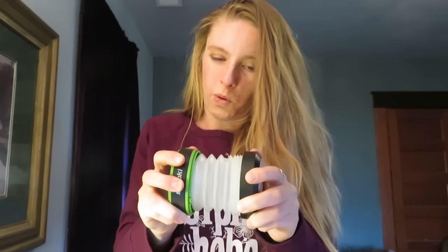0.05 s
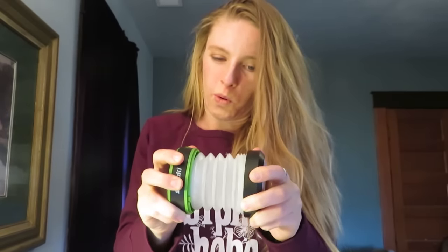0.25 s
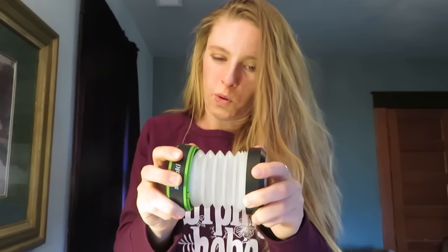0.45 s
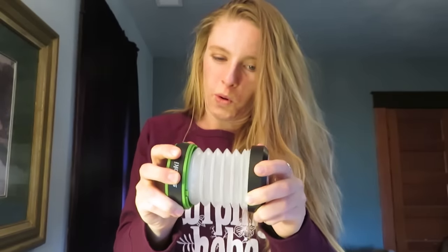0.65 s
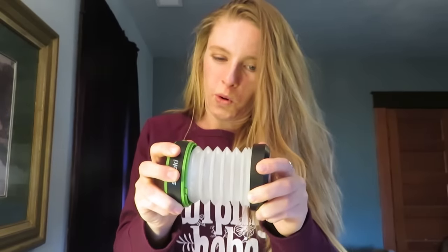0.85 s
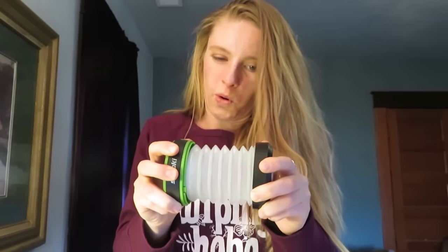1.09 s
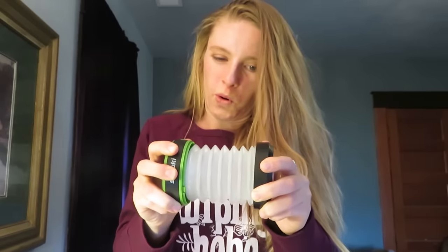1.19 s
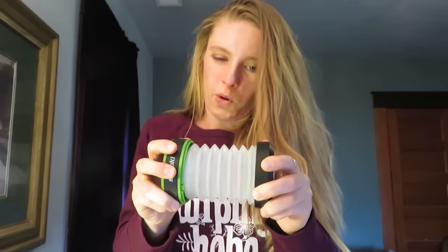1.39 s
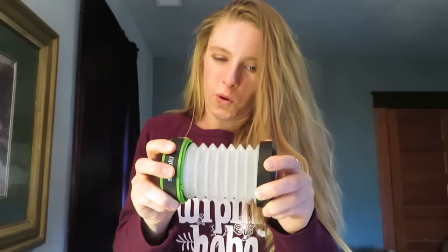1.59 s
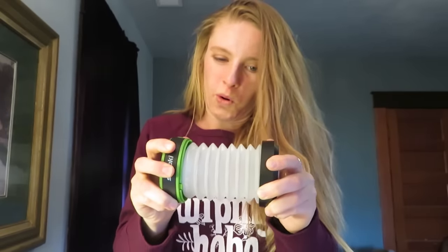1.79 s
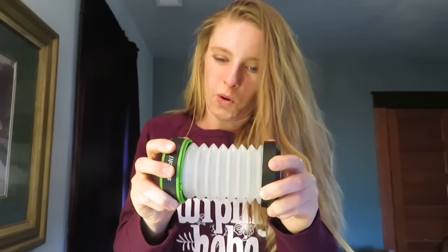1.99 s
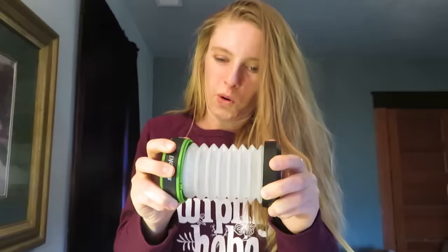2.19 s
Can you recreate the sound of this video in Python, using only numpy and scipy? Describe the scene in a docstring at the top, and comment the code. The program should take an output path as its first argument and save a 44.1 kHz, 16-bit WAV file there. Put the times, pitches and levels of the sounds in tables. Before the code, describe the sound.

A collapsible lantern is pulled open by hand. Its rubber folds slip softly and snap through one after another, making four hollow pops with tiny crinkles, close to the microphone in a quiet room with low hum and hiss.

```python
"""A low hum and microphone hiss in a quiet room, then a soft slip and the first of four hollow pops.
Close to a stereo microphone pair, a collapsible lantern is pulled open by hand. Four folds of its
rubber bellows turn out in turn: each slips a little, then snaps through and sets the soft wall ringing.
The room answers briefly, and the recorder's gain control ducks a little after each pop."""
import sys
import numpy as np
from scipy import signal
from scipy.fft import rfft, irfft
from scipy.io import wavfile
from scipy.ndimage import uniform_filter1d

SR = 44100
rng = np.random.default_rng(int(sys.argv[2]) if len(sys.argv) > 2 else 0)


def waveform_to_disk(signal):
    """Save audio, clipped to [-1, 1], as 16-bit WAV at the path in sys.argv[1]."""
    frames = np.transpose(np.atleast_2d(signal))
    scaled = np.clip(frames, -1, 1) * 32767
    samples = np.round(scaled).astype(np.int16)
    wavfile.write(sys.argv[1], SR, samples)


N = 99225

# room air at the microphones: f/Hz, relative level/dB
AIR_SPECTRUM = [(12, -41), (24, -23.5), (45, -10.5), (70, -13.5), (100, -16.5), (175, -14), (240, -22.5),
                (400, -25), (600, -25.5), (950, -27), (1300, -31), (2500, -34.5), (4500, -39.5),
                (6100, -39), (6750, -37.5), (10000, -47), (15000, -44)]
# how alike the two microphones hear the air: f/Hz, correlation
AIR_LIKENESS = [(40, 0.99), (130, 1), (300, 0.46), (1000, 0.47), (2500, 0.17), (5000, 0.65), (8000, 0.36),
                (14000, -0.58)]
# drift of the hiss: t/s, gain/dB
HISS_GAIN = [(0, 1), (.18, 2), (.3, 0.5), (.62, 0.5), (.76, 3), (1.05, 1.5), (1.3, 5), (1.56, 1), (2, 1.5),
             (2.25, -2.5)]
# partials of the hum: f/Hz, level/dB
HUM_PARTIALS = [(45, -44), (91.5, -50.5), (134, -54)]
# brief dips of the hum: t/s, gain/dB
HUM_GAIN = [(0, -1), (.19, -4.5), (.24, -20), (.31, -14), (.36, 2), (.72, -3), (.82, -2), (.9, -1.5),
            (1.1, 2.5), (1.45, -.5), (1.69, -10), (1.85, -0.5), (2.15, 1.5)]

# reverberation time of the room: f/Hz, t60/s
ROOM_DECAY = [(100, 0.25), (300, 0.46), (700, 0.4), (1800, 0.35), (5000, 0.49), (12000, 0.24)]
# colour of the diffuse tail: f/Hz, gain/dB
TAIL_COLOUR = [(100, -13), (200, 2.5), (330, -4.5), (430, -1), (620, -8), (820, 0.5), (1500, -1),
               (2500, -5), (6000, 2.5), (14000, 0)]
# how alike the two microphones hear the tail: f/Hz, correlation
TAIL_LIKENESS = [(30, .999), (500, 0.98), (1000, 0.99), (2500, 0.92), (8000, 0.14)]
# standing waves of the room: f/Hz, gain/dB
STANDING_WAVES = [(133, 12), (261, 12), (285, 5), (300, 9), (383, 4.5), (435, 8), (463, 8), (509, 9),
                  (698, 1), (798, 10), (945, 10)]
# echoes from near surfaces: delay/s, gain/dB
NEAR_ECHOES = [(.0068, -18), (0.0118, -21), (0.0315, -23)]
# the pop as it leaves the far sides of the bellows: f/Hz, relative level/dB
SCATTER_SPECTRUM = [(100, -27), (210, -13), (290, 5.5), (360, -9), (450, 2), (600, -5), (780, -3),
                    (1000, -15.5), (1300, -13.5), (1800, -23.5), (2600, -15), (4000, -35.5), (12000, -51.5)]

# crinkles as a fold settles: t/s, ring/dB, ring f/Hz, fizz/dB
WALL_CRINKLES = [(.2045, -24, 2210, -30), (0.209, -26.5, 1290, -31.5), (0.6867, -17, 787, -37),
                 (0.719, -32, 2300, -42), (1.134, -26, 1210, -44), (1.1577, -35, 1490, -40)]
# slips around the pops: t/s, thud/dB, thud f/Hz, bellows/dB, tick/dB, tick f/Hz, rub/dB
FOLD_SLIPS = [(0.1416, -18, 308, -29.5, -25.5, 2345, -51), (0.667, -15.5, 331, -24.5, -26.5, 2570, -43),
              (1.1110, -19.5, 322, -28.5, -60, 2360, -57), (1.1810, -16, 447.5, -34, -41, 2400, -43),
              (1.6180, -25, 344, -22.5, -34.5, 2630, -43)]
# bellows modes, rung by every slip: f/Hz, relative level/dB, t60/s (capped in ring)
BELLOWS_MODES = [(141.5, 5, 0.19), (650, -9, 0.076)]
# noise of the wall as it cracks, rubs or fizzes: f/Hz, relative level/dB
WALL_NOISE = [(500, 5.5), (2000, 6), (3500, -5), (6000, -5.5), (8500, -13.5), (11000, -28), (15000, -50)]
# the bright click that starts each pop: f/Hz, relative level/dB
CLICK_SPECTRUM = [(4000, -10), (8500, -2), (14000, -24.5)]
# modes of each fold, in opening order: f/Hz, relative level/dB, t60/s (capped in ring)
FOLD_1 = [(135, -22.5, 0.36), (290, -15.5, 0.077), (432, -12, 0.063), (654, 3, 0.017), (717, -17, 0.086),
          (880, -18.5, 0.05), (1157, -9, 0.018), (1573, -7.5, 0.0087), (1844, -19, 0.024),
          (2168, -23, 0.051), (2330, -20.5, 0.029), (2940, -21, 0.0071)]
FOLD_2 = [(129, -16.5, 0.061), (340, -4, 0.061), (428, -8, 0.1), (708, -7.5, 0.028), (770, -4.5, 0.025),
          (1120, -5.5, 0.0065), (1437, -17.5, 0.041), (1680, -24, 0.049), (2352, -11.5, 0.024),
          (3080, -12, 0.011)]
FOLD_3 = [(130.6, -20.5, 0.15), (277.4, -9.5, 0.089), (431, -9.5, 0.071), (503, -11, 0.041),
          (690, -14.5, 0.045), (823, -10.5, 0.042), (934, -21, 0.14), (1126, -18, 0.045),
          (1186, -18, 0.063), (2480, -27, 0.035), (3195, -28, 0.054)]
FOLD_4 = [(139, -20, 0.26), (267, -17, 0.15), (450, 0, 0.0084), (695, 3.5, 0.021), (830, -18, 0.097),
          (942, -18.5, 0.18), (1244, -3.5, .013), (1630, -24.5, 0.039), (1827, -19.5, 0.033),
          (1974, -20.5, 0.021), (2470, -11, 0.011), (2980, -24.5, 0.019)]
# one pop for each fold: t/s, ring/dB, crack/dB, room/dB, scatter/dB
FOLD_POPS = [(0.2004, 3, -35.5, -9.5, -32), (0.6847, -1.5, -28, -8, -33.5), (1.1290, 1, -32.5, -7, -33.5),
             (1.6493, 0, -34, -8.5, -34.5)]

AIR_DB, HISS_FROM_HZ, HUM_DRIFT_HZ, HUM_WAVER = -46.5, 2300, 1.3, 0.25
ROOM_ONSET_S, SMALL_SOUNDS_ROOM_DB = 0.011, -7
CONTACT_S, THUD_RISE_S, TICK_RISE_S, CRACK_RISE_S = 0.00048, 0.00092, 0.0022, 0.00034
LONGEST_RING_S, SOFT_HZ, CLICK_DB = 0.125, 3200, -14.5
RADIATES_FROM_HZ = 175  # the small body sends out little deep bass
DUCK_ABOVE_DB, DUCK_SHARE, DUCK_ATTACK_S, RECOVER_DB_PER_S = -21.5, 0.17, 0.084, 33.5
TREBLE_HZ, EDGE_HZ = 11000, 15300


def amp(db):
    """Decibels to gain."""
    return 10 ** (np.asarray(db) / 20)


def fade(t, t60):
    """Exponential decay, 60 dB down at t60 seconds."""
    return amp(-60 * t / t60)


def read(points, hz):
    """Reads a table on a log-frequency axis."""
    f, value = np.transpose(points)
    return np.interp(np.log(hz + 1), np.log(f + 1), value)


def add(mix, s, sound):
    """Mixes a sound in at s seconds."""
    part = mix[..., round(s * SR):][..., :sound.shape[-1]]
    part += sound[..., :part.shape[-1]]


def butter(hz, kind="low"):
    """A second-order filter."""
    return signal.butter(2, hz, kind, fs=SR, output="sos")


def noise(spectrum, size):
    """Noise with a given spectrum and an rms of one."""
    gain = amp(read(spectrum, np.fft.rfftfreq(size, 1 / SR)))
    x = irfft(rfft(rng.standard_normal(size)) * gain, size)
    return x / np.sqrt(np.mean(x ** 2) + 1e-20)


def wander(count=24):
    """A slow random curve."""
    return np.interp(np.linspace(0, count - 1, N), np.arange(count), rng.standard_normal(count))


def microphone_pair(a, b, likeness):
    """Two microphones in a diffuse field: alike in the bass, less so in the treble."""
    same = np.clip(read(likeness, np.fft.rfftfreq(len(a), 1 / SR)), -1, 1)
    mid = irfft(rfft(a) * np.sqrt((1 + same) / 2), len(a))
    side = irfft(rfft(b) * np.sqrt((1 - same) / 2), len(a))
    return np.array([mid + side, mid - side])


def background():
    """The quiet room: air all around, a drifting microphone hiss and a wavering low hum in the centre."""
    t = np.arange(N) / SR
    hum = np.zeros(N)
    for hz, db in HUM_PARTIALS:
        level = np.sqrt(2) * amp(db) * (1 + HUM_WAVER * wander())
        hum += level * np.sin(2 * np.pi * np.cumsum(hz + HUM_DRIFT_HZ * wander()) / SR)
    air = amp(AIR_DB) * microphone_pair(noise(AIR_SPECTRUM, N), noise(AIR_SPECTRUM, N), AIR_LIKENESS)
    hiss = signal.sosfiltfilt(butter(HISS_FROM_HZ, "high"), air)
    hiss_gain = amp(np.interp(t, *np.transpose(HISS_GAIN)))
    hum_gain = amp(np.interp(t, *np.transpose(HUM_GAIN)))
    return air - hiss + hiss * hiss_gain + hum * hum_gain


def room_tail():
    """Diffuse reflections swell, then each band dies at its own speed."""
    size = SR // 2
    t = np.arange(size) / SR
    swell = 1 - np.exp(-(t / ROOM_ONSET_S) ** 2) + 1e-3
    shape = swell * fade(t, t60=0.4)
    x = rng.standard_normal(size) * shape
    for _ in range(2):  # even out the spectrum, then restore the envelope
        x = irfft(np.exp(1j * np.angle(rfft(x))), size)
        x = x / np.sqrt(uniform_filter1d(x ** 2, size=300) + 1e-20) * shape
    hz, times, bands = signal.stft(x / shape * swell, SR, nperseg=256)
    bands *= fade(times, read(ROOM_DECAY, hz)[:, None]) * amp(read(TAIL_COLOUR, hz))[:, None]
    return signal.istft(bands, SR)[1][:size] / np.linalg.norm(x)


def standing_waves(size):
    """The room's own low notes, which sing on after every pop."""
    t = np.arange(size) / SR
    waves = np.zeros(size)
    for hz, db in STANDING_WAVES:
        dying = fade(t, read(ROOM_DECAY, hz))
        waves += 2 * amp(db) * dying / dying.sum() * np.sin(2 * np.pi * hz * t)
    return waves * (1 - np.exp(-(t / ROOM_ONSET_S) ** 2))


def in_room(x, room_db):
    """A source at close range: direct sound, near echoes, the diffuse tail and the standing waves."""
    burst = x * fade(np.arange(len(x)) / SR, t60=0.08)  # the first burst is what fills the room
    room = microphone_pair(room_tail(), room_tail(), TAIL_LIKENESS) + standing_waves(SR // 2)
    out = amp(room_db) * signal.fftconvolve(burst[None], room, axes=1)
    add(out, 0.00033, x)  # direct path
    for delay, db in NEAR_ECHOES:
        add(out, delay, amp(db) * x)
    return out


def scatter(level_db):
    """Sound thrown away from the microphones, heard only by way of the room."""
    wash = microphone_pair(room_tail(), room_tail(), TAIL_LIKENESS)
    size = wash.shape[1]
    colour = amp(read(SCATTER_SPECTRUM, np.fft.rfftfreq(2 * size, 1 / SR)))
    wash = irfft(rfft(wash, 2 * size) * colour, 2 * size)[:, :size]
    return amp(level_db) * wash / wash[:, :SR // 20].std()


def ring(modes, t, rise_s):
    """Damped modes set going by a push of finite length."""
    ringing = sum(amp(db) * fade(t, min(t60, LONGEST_RING_S)) * np.sin(2 * np.pi * hz * t)
                  for hz, db, t60 in modes)
    return (1 - np.exp(-t / rise_s)) * ringing


def rubber_wall(modes, t):
    """The wall rings after a snap, its rubber damping the treble."""
    return signal.sosfilt(butter(SOFT_HZ), ring(modes, t, CONTACT_S))


def crinkle(ring_db, hz, fizz_db, t60=0.03):
    """A small dry secondary snap of the wall."""
    t = np.arange(SR // 10) / SR
    fizz = amp(fizz_db) * noise(WALL_NOISE, len(t)) * fade(t, t60)
    return rubber_wall([(hz, ring_db, t60)], t) + fizz


def slip(thud_db, thud_hz, bellows_db, tick_db, tick_hz, rub_db, thud_t60=0.06):
    """A fold gives a little: a soft thud that rings the bellows, a gritty tick and a short rub."""
    t = np.arange(SR // 2) / SR
    thud = ring([(thud_hz, thud_db, thud_t60)], t, THUD_RISE_S)
    bellows = ring(BELLOWS_MODES, t, THUD_RISE_S)
    tick_band = [(100, -60), (tick_hz / 1.22, -24), (tick_hz, 0), (tick_hz * 1.22, -24), (12000, -68)]
    tick = noise(tick_band, len(t)) * fade(t, t60=0.021) * (1 - np.exp(-t / TICK_RISE_S))
    rub = noise(WALL_NOISE, len(t)) * fade(t, t60=0.11)
    return thud + amp(bellows_db) * bellows + amp(tick_db) * tick + amp(rub_db) * rub


def pop(modes, ring_db, crack_db):
    """A fold snaps through: its soft wall rings, with a bright click and a faint crack on top."""
    t = np.arange(SR // 2) / SR
    crack = noise(WALL_NOISE, len(t)) * fade(t, t60=0.07) * (1 - np.exp(-t / CRACK_RISE_S))
    click = amp(CLICK_DB) * noise(CLICK_SPECTRUM, len(t)) * fade(t, t60=0.025)
    return amp(ring_db) * rubber_wall(modes, t) + amp(crack_db) * (crack + click)


def scene():
    """The lantern slips, pops and crinkles close up and centred, with the quiet room behind it."""
    lantern = np.zeros((2, N))
    folds = [FOLD_1, FOLD_2, FOLD_3, FOLD_4]
    for modes, (s, ring_db, crack_db, room_db, scatter_db) in zip(folds, FOLD_POPS):
        add(lantern, s, in_room(pop(modes, ring_db, crack_db), room_db))
        add(lantern, s, scatter(scatter_db))
    for s, *settings in FOLD_SLIPS:
        add(lantern, s, in_room(slip(*settings), SMALL_SOUNDS_ROOM_DB))
    for s, *settings in WALL_CRINKLES:
        add(lantern, s, in_room(crinkle(*settings), SMALL_SOUNDS_ROOM_DB))
    return signal.sosfilt(butter(RADIATES_FROM_HZ, "high"), lantern) + background()


def record(dry):
    """Gain control ducks a little after each pop, the treble rolls away and loud peaks are rounded."""
    power_db = 10 * np.log10(abs(uniform_filter1d((dry ** 2).mean(0), size=256)) + 1e-12)
    fall_db = np.arange(N) / SR * RECOVER_DB_PER_S
    held_db = np.maximum.accumulate(power_db + fall_db) - fall_db  # catches peaks, then sinks steadily
    over_db = np.maximum(held_db - DUCK_ABOVE_DB, 0)
    pole = np.exp(-1 / (DUCK_ATTACK_S * SR))
    duck_db = DUCK_SHARE * signal.lfilter([1 - pole], [1, -pole], over_db)
    dull = signal.sosfilt(butter(TREBLE_HZ), dry * amp(-duck_db))
    rounded = dull / (1 + (dull / 0.995) ** 8) ** (1 / 8)
    low_pass = signal.firwin(511, EDGE_HZ, window=("kaiser", 9), fs=SR)
    return signal.oaconvolve(rounded, low_pass[None], "same")


dry = scene()
out = record(dry)
waveform_to_disk(out)
```